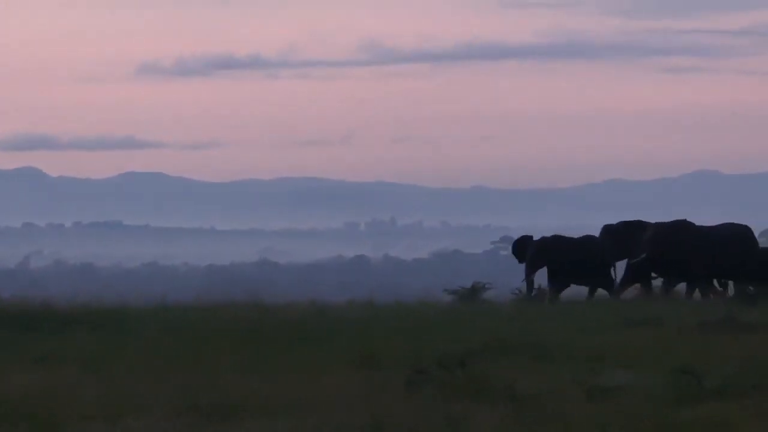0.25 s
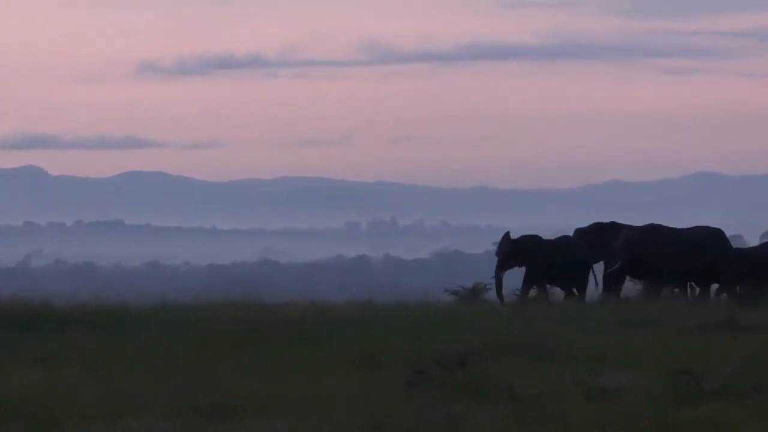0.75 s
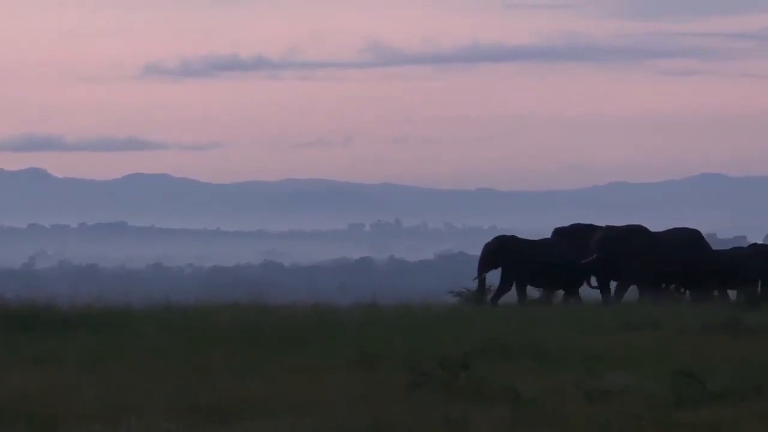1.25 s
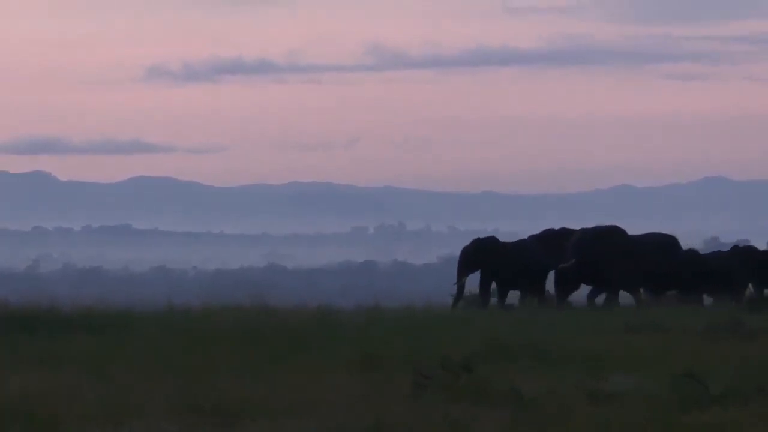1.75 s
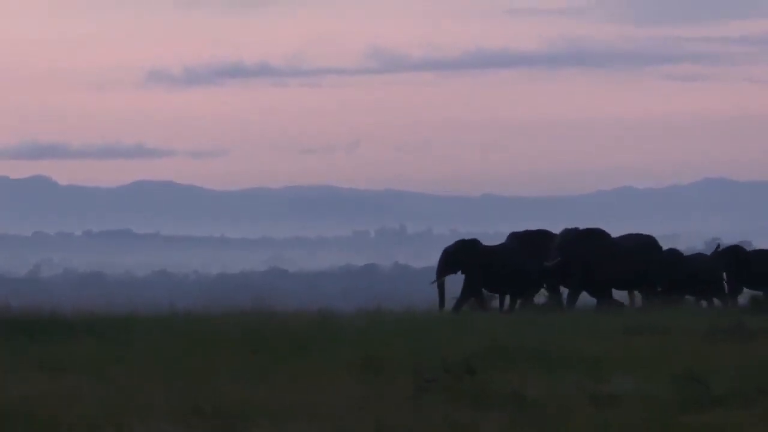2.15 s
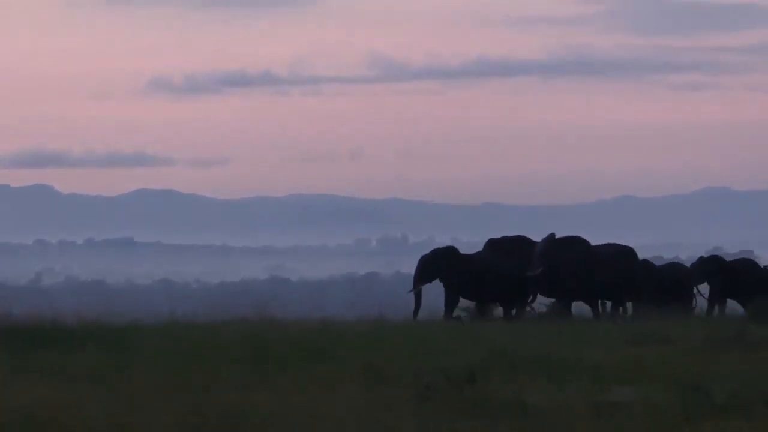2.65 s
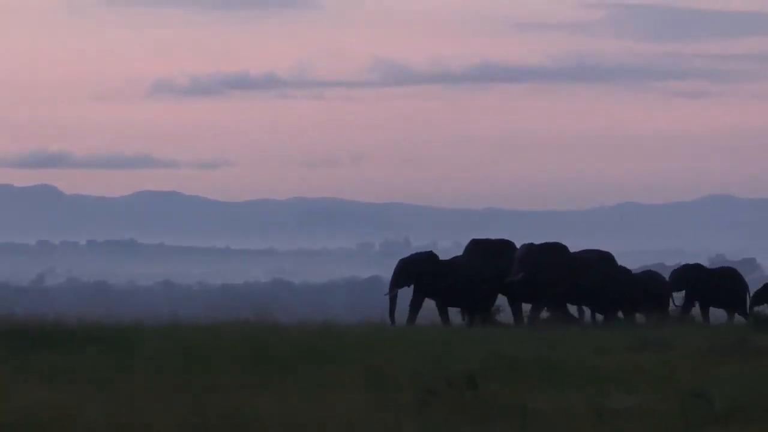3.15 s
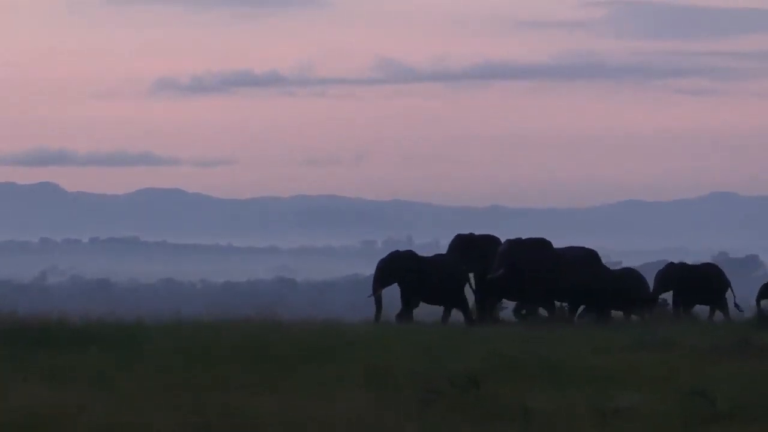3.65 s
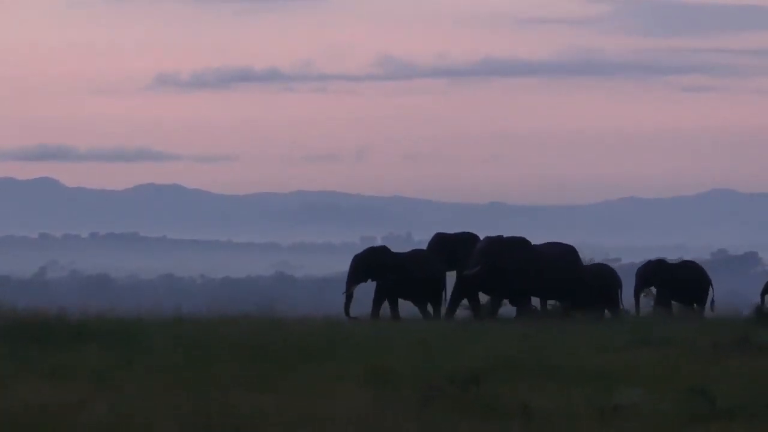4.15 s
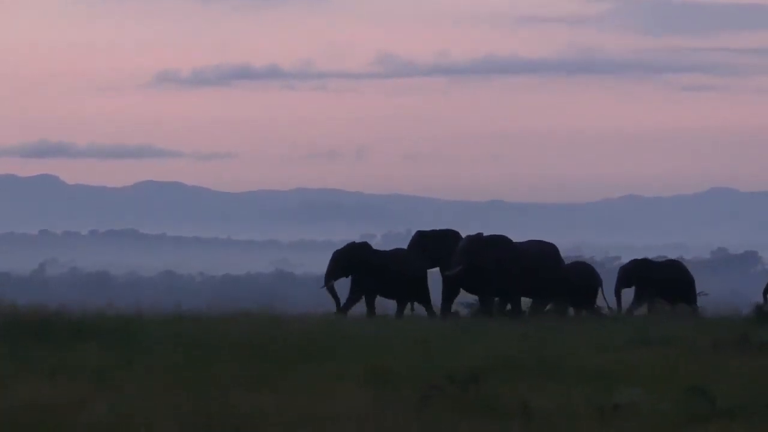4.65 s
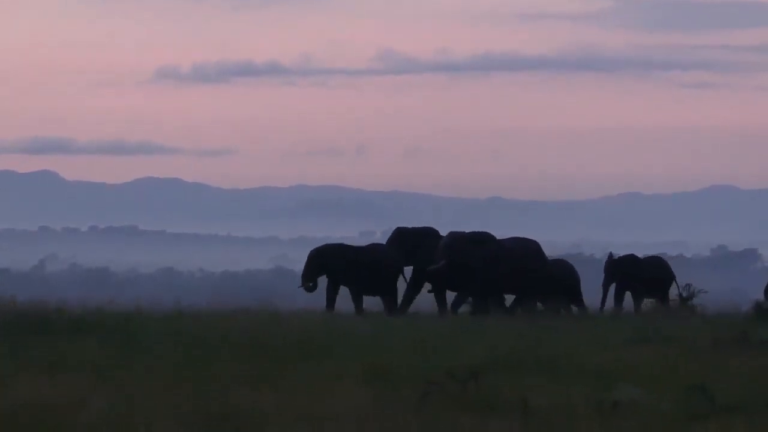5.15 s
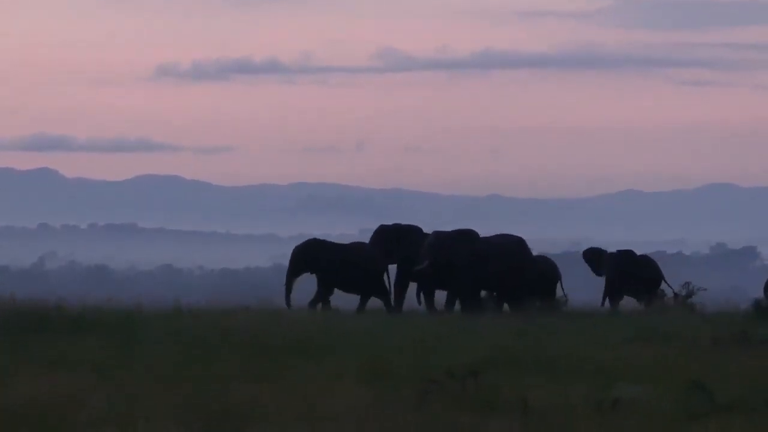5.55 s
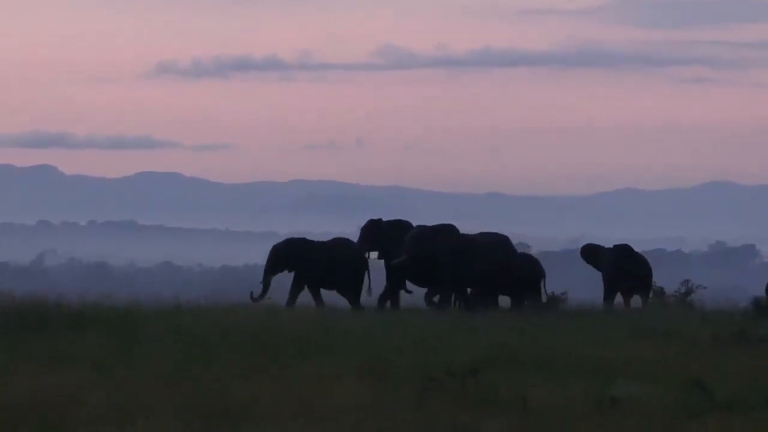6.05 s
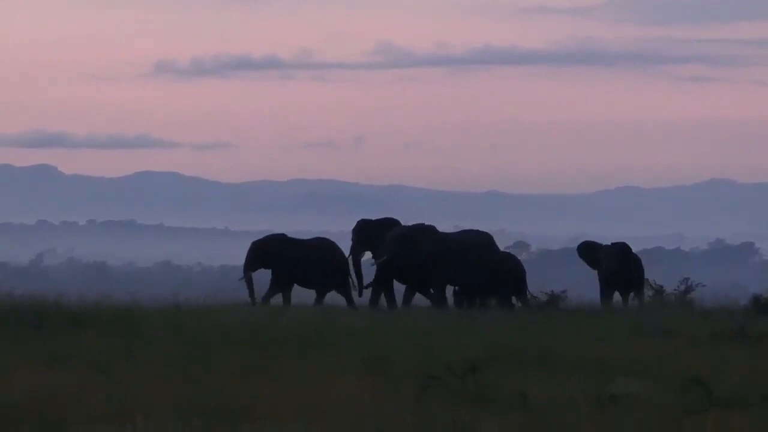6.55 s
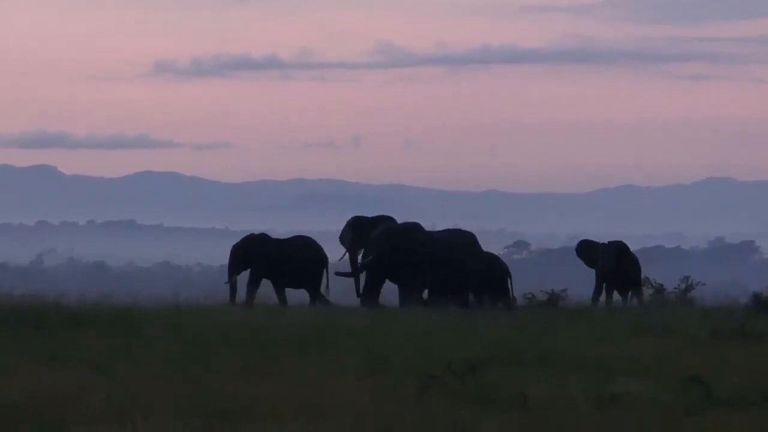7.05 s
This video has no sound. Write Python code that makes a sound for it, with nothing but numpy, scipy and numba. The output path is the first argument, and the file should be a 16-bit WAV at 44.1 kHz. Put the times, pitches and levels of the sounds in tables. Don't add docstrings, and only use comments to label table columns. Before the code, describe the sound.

Quiet open-air ambience with distant birdsong and low wind buffets on two small microphones. After an opening two-note bird whistle, an elephant bellows roughly, beginning in jerky bursts, swelling to a full gravelly roar and closing down dark. Then faint frog pips, a hard wind thump as the whistle returns, fabric shifting and scraping close by, and finally sparse far chirps, cricket trills and soft wind.

```python
import sys
import numpy as np
from scipy import signal
from scipy.fft import rfft, irfft
from scipy.io import wavfile
from scipy.ndimage import uniform_filter1d
from numba import njit

SR = 44100
rng = np.random.default_rng(int(sys.argv[2]) if len(sys.argv) > 2 else 0)


def wav_record(signal):
    frames = np.transpose(np.atleast_2d(signal))
    bounded = np.clip(frames, -1, 1)
    quanta = np.round(bounded * 32767).astype(np.int16)
    wavfile.write(sys.argv[1], SR, quanta)


def ratio_of_db(decibels):
    return 10 ** (np.asarray(decibels, float) / 20)


N = 321489

# (frequency [Hz], density [dB per Hz])
FIELD_TONE = [(18, -43), (30, -13), (108, -2), (203, -3), (256, -2), (400, -9.5), (444, 5.5), (592, -10.5),
              (1030, -4.5), (1270, -9.5), (2560, -7), (2920, -5), (3160, -13), (4680, -13), (15600, -58.5)]
FIELD_DB = -50

# (time [s], level [dB])
WIND_LEVEL = [(0, -54.5), (.18, -51.5), (.6, -60), (1.6, -61), (1.8, -46), (2.15, -48), (2.3, -60),
              (2.98, -66.5), (3.2, -54.5), (3.5, -56.5), (3.95, -55), (4.39, -44.5), (4.55, -52),
              (4.66, -60.5), (5.7, -65), (6.58, -56), (6.92, -62.5), (7.15, -52.5)]
# (time [s], extra level [dB], half length [s])
GUST_SWELLS = [(2.59, 14, 0.041), (2.4, 3, 0.086), (2.9, 1, 0.11), (3.44, -8, 0.063), (3.62, -7, 0.042),
               (5.3, -1.5, 0.16), (6.8, 3, 0.093), (5.1, 0, 0.045), (3.35, -6, 0.066), (2.68, 1, 0.046),
               (.75, 1, .06), (2.7, -14, 0.032), (6.3, -2.5, 0.13), (4.3, 7, 0.035), (5.4, 1, .03),
               (5.6, -2, 0.027), (5.8, 7.5, 0.12), (6.1, -0.5, .08), (6.92, 10, 0.037), (7.02, -6, 0.037),
               (7.22, 2.5, 0.027)]
# (crest time [s], peak level [dB], pitch [Hz])
BUFFETS = [(.061, -28.5, 307), (0.194, -29.5, 160), (.518, -32.5, 128), (0.885, -41.5, 120),
           (1.17, -41.5, 120), (1.751, -32, 108), (1.939, -31, 114), (2.06, -33.5, 113), (2.182, -38, 110),
           (3.269, -40, 236), (3.759, -38, 125), (3.93, -32, 161), (3.97, -30, 136), (4.098, -25, 143),
           (4.205, -37.5, 162), (4.278, -34.5, 175), (4.335, -23, 157), (4.362, -24.5, 213),
           (4.407, -26, 158), (4.428, -28, 175), (4.453, -35, 123), (4.476, -30.5, 121), (4.506, -32, 144),
           (4.529, -13, 247), (4.546, -29, 190), (4.891, -41.5, 79.5), (6.006, -45, 113), (6.358, -42, 103),
           (6.664, -34, 115), (7.101, -30.5, 159)]
# (time [s], length [s], peak level [dB], pitch [Hz])
BUFFET_RUNS = [
    (.11, .02, -42, 105),
    (1.048, .02, -47, 123),
    (3.13, .25, -45, 194),
    (4., .31, -39.5, 127),
    (5.02, .02, -48, 89.5),
    (6.44, .26, -40.5, 110),
    (7.15, .06, -37, 135),
]
BUFFET_EVERY_S = 0.03

# (time [s], hold [s], extra level [dB])
CLOTH_SHIFTS = [
    (3.248, .02, 1.5),
    (3.96, 0.022, 7.5),
    (4.154, 0.17, 8.5),
    (4.6, 0.48, 6),
    (5.346, 0.15, 8.5),
    (6.314, 0.16, 2.5),
]
CLOTH_DB, CLOTH_RISE_S, CLOTH_FALL_S = -65, 0.22, 0.085
# (time [s], length [s], level [dB])
SCRAPE_SLIPS = [(.74, .05, -61), (.94, .07, -59), (5.345, .17, -52), (5.352, .009, -40), (5.376, .012, -45),
                (5.393, .03, -44), (5.41, .03, -41), (5.428, .022, -41), (5.457, .013, -46),
                (5.471, .012, -50), (5.483, .012, -48)]
# (time [s], peak level [dB], centre [Hz])
CLOTH_TICKS = [
    (.058, -48, 3000),
    (.327, -50, 3000),
    (.765, -51, 2500),
    (.989, -47, 4500),
    (3.269, -46, 5000),
    (4.997, -37, 4300),
    (5.486, -36, 8000),
    (5.566, -48, 9000),
    (6.391, -47, 9000),
]

# (time [s], length [s], peak level [dB])
CRICKET_TRILLS = [
    (.022, .1, -55),
    (.42, .16, -57),
    (.745, .24, -60),
    (6.19, .12, -65),
    (6.502, .05, -64),
    (6.92, .33, -65),
]
CHIRP_EVERY_S = .039
# (time [s], run length [s], peak level [dB])
FROG_PIPS = [
    (2.131, .63, -49.5),
    (2.792, .16, -53),
    (4.4574, .01, -55),
    (4.5585, .01, -50.5),
    (4.922, .01, -39),
    (4.985, .01, -38.5),
    (5.3417, .01, -47),
]
PIP_HZ, PIP_EVERY_S = 2700, .0664

# (time [s], length [s], first pitch [Hz], last pitch [Hz], level
# [dB])
FAR_SLURS = [(0, 0.053, 3900, 2660, -56), (.091, 0.034, 2520, 2880, -52.5), (.024, 0.17, 2170, 2074, -67),
             (6.675, 0.05, 1770, 1600, -58), (.838, 0.044, 2770, 2470, -54),
             (2.771, 0.024, 4700, 3960, -62), (4.6, 0.128, 4050, 3960, -61.5),
             (5.025, 0.051, 3640, 3450, -61), (5.508, 0.051, 3710, 3570, -59.5),
             (5.939, 0.0255, 3450, 2930, -57), (6.162, 0.035, 3250, 3420, -63),
             (6.341, 0.039, 2710, 1970, -51.5), (6.539, 0.013, 2700, 2530, -51.5),
             (6.98, 0.04, 3560, 3730, -61.5),
             (.005, 0.18, 2070, 2056, -63), (0.141, 0.21, 2300, 2263, -63),
               (0.333, 0.099, 3860, 3966, -62), (0.459, 0.062, 1360, 1626, -64),
               (0.528, 0.047, 1640, 1410, -70), (.945, 0.065, 4600, 4450, -64),
               (1.1, 0.13, 2700, 2960, -65), (2.412, .075, 3650, 3000, -64), (2.89, 0.067, 2040, 2170, -67),
               (3.026, 0.079, 3180, 3600, -73), (3.12, 0.035, 2200, 2150, -61.5),
               (3.26, 0.13, 1840, 1780, -66.5), (3.645, 0.032, 3550, 3750, -71),
               (3.813, 0.023, 3060, 3020, -61), (4.007, 0.032, 2210, 2300, -63),
               (4.28, 0.029, 2020, 1970, -64), (5.139, 0.16, 4120, 3950, -70.5),
               (5.615, .035, 3650, 3700, -64), (5.745, 0.045, 2610, 2510, -57),
               (5.674, 0.046, 2220, 2380, -61), (5.736, .04, 2056, 2070, -60),
               (5.995, .03, 3280, 3260, -63), (6.415, 0.032, 3600, 3810, -60),
               (6.4, 0.067, 3200, 3310, -62), (6.525, .015, 4110, 4260, -65),
               (6.65, 0.048, 2170, 2240, -60), (6.752, 0.11, 3700, 3850, -71),
               (6.84, 0.04, 3350, 3520, -62), (6.993, 0.05, 1650, 1500, -65),
               (6.98, 0.095, 3180, 3040, -65), (6.39, 0.049, 1840, 1570, -61.5),
               (6.82, 0.066, 1870, 1867, -63)]
# (time [s], length [s], first pitch [Hz], level [dB])
RISING_SLURS = [
    (3.874, 0.083, 2306, -58),
    (4.331, 0.068, 1806, -59),
    (5.261, 0.12, 1940, -61),
    (5.863, 0.045, 2320, -53.5),
]
UPSLUR_RISE = 1.36
# (time [s], level [dB])
BIRD_CHIPS = [
    (1.363, -54),
    (1.909, -51.5),
    (2.144, -48.5),
]
CHIP_S, CHIP_HZ, CHIP_END_HZ = 0.0126, 3860, 4500
# (level [dB], tune of (time [s], pitch [Hz]))
BENT_TUNES = [(-61, [(2.67, 2000), (2.71, 2850), (2.745, 3120)]), (-58.5, [(2.885, 3990), (2.935, 3300),
              (3.06, 2920)]), (-60, [(2.92, 3400), (2.965, 2900)]), (-56, [(3.18, 2050), (3.225, 2290),
              (3.243, 2840), (3.262, 2820)]), (-62, [(3.32, 2350), (3.345, 2900), (3.375, 3020),
              (3.44, 2850)]), (-71, [(3.47, 2410), (3.51, 2950), (3.68, 3010)]), (-64, [(3.53, 2050),
              (3.56, 2270), (3.61, 2210)]), (-54.5, [(5.555, 3420), (5.577, 2960), (5.592, 3040)]),
              (-67.5, [(5.575, 1720), (5.62, 1874), (5.71, 1880)]), (-66, [(5.645, 3920), (5.7, 4040),
              (5.73, 3980), (5.77, 3600)]), (-54.5, [(5.68, 3440), (5.725, 3520), (5.82, 3165), (5.9, 3025),
              (5.97, 2840), (6.09, 2690)]), (-58, [(5.875, 2180), (5.9, 2650), (5.93, 2830)]),
              (-62, [(5.962, 2780), (5.99, 2680)]), (-54, [(5.97, 1830), (6.048, 2700), (6.078, 2600)]),
              (-56.5, [(6.755, 2800), (6.78, 2520), (6.835, 2410)]), (-60, [(7.03, 1845), (7.055, 2080),
              (7.093, 2850)]), (-64, [(7.058, 4080), (7.085, 3320), (7.118, 2570)]), (-61, [(7.155, 2240),
              (7.19, 2800), (7.215, 2710)]), (-64, [(7.197, 2910), (7.225, 3170), (7.25, 3180)])]
BENT_SWELL_DB = 2
FALL_BEND, RISE_BEND = 0.604, .8
FAINT_DB = -58
# (time [s], extra level [dB], half length [s])
CROWD_SWELLS = [
    (.15, 9, 0.15),
    (2.8, 3.5, 0.16),
    (3.35, 1, 0.19),
    (4.1, -15, 0.09),
    (5.75, 6.5, 0.79),
    (6.75, 5.5, 0.19),
]
CHORUS_DB, CHORUS_LOW_HZ, CHORUS_SPAN_HZ = -70.5, 1450, 2000

# (time [s], falling note [dB], its swell [dB per s], level note [dB], its swell [dB per s])
BIRD_SONGS = [
    (.04, -36.5, -3, -35.5, 0),
    (4.446, -35.5, -15, -36.5, -12),
]
LEVEL_AFTER_S = 0.3385
# (time [s], pitch [Hz], level [dB])
FALLING_TUNE = [(.005, 4770, -9), (0.03, 4470, 1.5), (0.065, 4070, -9.5), (0.084, 3930, -2),
                (.118, 3700, 2), (.135, 3610, -3.5), (0.186, 3356, -3), (0.213, 3260, 5),
                (0.247, 3030, -17.5)]
# (time [s], pitch [Hz], level [dB])
LEVEL_TUNE = [(.003, 3050, -10), (.016, 3000, -2), (.035, 2950, -4.5), (.07, 2938, -6), (0.151, 3004, -1.5),
              (.19, 3080, -1), (.205, 3125, -3.5), (.216, 3010, 0)]
FLUTTER_HZ, FLUTTER_DB = 48, 2.5

# (time [s], effort [dB], jaw closed [0-1])
ROAR_EFFORT = [
    (1.218, -39.5, 0.04),
    (1.4, -38.5, 0.35),
    (1.56, -32.5, 0),
    (1.7, -29.5, 0.32),
    (1.9, -30.5, 0.27),
    (2.05, -28.5, 0.57),
    (2.29, -28, 0.51),
    (2.35, -38, 0.95),
    (2.5, -58.5, 0.77),
]
# (time [s], level [dB], pitch [Hz])
CHEST_NOTE = [
    (1.13, -57, 250),
    (1.22, -40, 265),
    (1.55, -35.5, 262.4),
    (1.66, -45.5, 250),
    (2.14, -43, 290),
    (2.21, -34.5, 277),
    (2.4, -38.5, 259.5),
    (2.47, -42, 252),
    (2.53, -58.5, 238),
]
CHEST_TONE = .42
# (time [s], extra level [dB])
CHEST_BOOMS = [
    (1.832, 8.4),
    (2.232, 3.6),
    (2.31, 9.1),
    (2.4, 2.2),
]
BOOM_S = 0.031
# (time [s], extra level [dB], fading [s])
BREATH_HEAVES = [
    (1.221, 4, .02),
    (1.26, 4, .012),
    (1.287, 2, .01),
    (1.342, 12, .01),
    (1.358, 5, .01),
    (1.378, 4, .008),
    (1.495, 3, .012),
    (1.527, 5, .01),
    (1.557, 7, .008),
]
HEAVE_SLAP = 22
# (time [s], extra level [dB])
FOLD_SLAPS = [(1.578, 2), (1.674, 4), (1.704, 4), (1.745, 5), (1.77, 3), (1.79, 2), (1.815, 4), (1.844, 3),
              (1.903, 2), (1.946, 2), (2.067, 3), (2.143, 4), (2.193, 2), (2.23, 2)]
SLAP_FADE_S = 0.0021
FOLDS_HZ, TURBULENCE = 199., .3
# (centre [Hz], width [Hz], level [dB])
MOUTH_MODES = [(830, 220, 3), (1040, 400, 7), (1200, 170, -3), (940, 110, -9)]
# (centre [Hz], width [Hz], level [dB])
LOW_MOUTH_MODES = [(685, 95, 3), (590, 80, -8), (505, 60, -4)]
# (centre [Hz], width [Hz], level [dB])
UPPER_MODES = [(1720, 280, 14), (2000, 320, 11), (2270, 200, 8), (1550, 200, 4)]
MOUTH_LOW_HZ, MOUTH_TOP_HZ = 440, 1325
JAW_OPEN_DB, JAW_SHUT_DB = -12.5, 6
JAW_DROP = .12
PATCHY_DB = 2.5
# (time [s], strain [0-1], half length [s], rasp centre [Hz])
THROAT_STRAINS = [(1.27, 0, .03, 3030), (1.355, 1.1, 0.02, 2920), (1.495, 0.8, 0.018, 2950),
                  (1.56, 0.35, 0.021, 3100), (1.69, 0.4, 0.036, 3070), (1.745, 0, 0.012, 3150),
                  (1.85, 0.46, 0.042, 3550), (1.98, 0.2, 0.054, 3760), (2.11, 0.24, 0.033, 3280),
                  (2.23, 0.88, 0.069, 3680), (2.43, 1, 0.07, 3060)]
UPPER_DB, UPPER_STRAIN_DB, RASP_DB, RASP_STRAIN_DB = -15.5, 4, -23, 10.5
# (time [s], centre [Hz], extra level [dB])
TONGUE_RIDGE = [(1.3, 1734, 0), (1.67, 1780, -2.5), (1.88, 1770, -1.5), (1.94, 1740, -3), (2.0, 1820, 3.5),
                (2.085, 1650, -8.5), (2.15, 1745, -0.5), (2.25, 1680, -2.5), (2.34, 1690, 3.5)]
# (time [s], gain against the broad ridge, half length [s])
TONGUE_PINCHES = [
    (1.9, 1.5, 0.069),
    (2.14, 1.1, 0.02),
    (2.245, 3.7, 0.063),
]
PINCH_WIDTH_HZ = 164
# (time [s], left minus right [dB])
HEAD_BALANCE = [(1.2, 0.5), (1.7, 1), (2.1, 1), (2.45, 1.5)]

# (frequency [Hz], left minus right [dB])
PORT_SHADE = [(60, -10), (110, 31), (200, 1.5), (380, 0), (700, -1.5), (1290, -10), (2380, -5), (4400, -6),
              (8120, 2), (15000, 0.0)]
# (frequency [Hz], left lead [radians])
PORT_LEAD = [(100, 0.01), (690, -0.95), (1210, -0.59), (1550, -0.014), (2330, -0.82), (4900, 0.23)]
SIDE = np.array([[1], [-1]])
AIR_SHIFTS_S = .05
MIC_LOW_HZ = 48.7


def unit(x):
    return x / np.sqrt(np.mean(x ** 2))


def columns(table, outside=None):
    s, *cols = np.transpose(table)
    return [np.interp(np.arange(N) / SR, s, c, left=outside, right=outside) for c in cols]


def on_log(table, hz):
    f, v = np.transpose(table)
    return np.interp(np.log(hz + 1), np.log(f + 1), v)


@njit
def svf(x, hz, width):
    y, b, l = np.empty(len(x)), 0., 0.
    for i in range(len(x)):
        g, k = np.tan(np.pi * hz[i] / SR), width / hz[i]
        v = (b + g * (x[i] - l)) / (1 + g * (g + k))
        b, l, y[i] = 2 * v - b, l + 2 * g * v, k * v
    return y


def ring(x, hz, width_hz):
    hz = hz + np.zeros(len(x))
    return svf(svf(x, hz, 1. * width_hz), hz, 1. * width_hz)


def hiss(hz, width_hz):
    return unit(ring(rng.standard_normal(N), hz, width_hz))


def walk(rate):
    k = int(SR / rate)
    held = np.repeat(rng.standard_normal(N // k + 1), k)
    return 1.3 * uniform_filter1d(uniform_filter1d(held, k), k)[:N]


def bumps(rows):
    t = np.arange(N) / SR
    return sum(top * np.exp(-((t - s) / half) ** 2) for s, top, half in rows)


def steady(x, hold_s):
    k = int(hold_s * SR)
    power = uniform_filter1d(uniform_filter1d(x ** 2, k), k)
    return x / np.sqrt(power + 1e-12)


def train(rows, every_s, jitter, scatter_db):
    beats = [(s + k, db, *more) for s, length, db, *more in rows for k in np.arange(0, length, every_s)]
    chance = rng.standard_normal((len(beats), 2))
    return [(s + jitter * every_s * a, db + scatter_db * b, *more)
            for (s, db, *more), (a, b) in zip(beats, chance)]


def add(out, s, sound):
    i = int(s * SR)
    out[..., i:i + sound.shape[-1]] += sound[..., :N - i]


def pan(db):
    return ratio_of_db(np.array([[db], [-db]]) / 2)


def ports(x):
    hz = np.fft.rfftfreq(N, 1 / SR)
    half = ratio_of_db(on_log(PORT_SHADE, hz) / 2) * np.exp(.5j * on_log(PORT_LEAD, hz))
    return np.array([irfft(rfft(x) * half, N), irfft(rfft(x) / half, N)])


def far_trees(x, t60, db, apart, shifting=False):
    t = np.arange(int(t60 * SR)) / SR
    paths = rng.standard_normal((2, len(t)))
    hop = int(AIR_SHIFTS_S * SR) if shifting else N
    window = np.sin(np.pi * np.arange(2 * hop) / (2 * hop)) if shifting else np.ones(N)
    x, out = x * np.ones((2, 1)), np.zeros((2, N))
    for k, i in enumerate(range(0, N, hop)):
        same, other = np.roll(paths, 997 * k, axis=1) * ratio_of_db(-60 * t / t60)
        tail = (same + apart * SIDE * other) / np.sqrt(np.sum(same ** 2))
        piece = x[:, i:i + len(window)]
        piece = piece * window[:piece.shape[1]]
        add(out, (i + .5) / SR, signal.fftconvolve(piece, tail, axes=1))
    return ratio_of_db(db) * out


def field():
    out, swell = 0, walk(0.72)
    for hz in 240 * 2 ** (np.arange(19) / 3):
        db = on_log(FIELD_TONE, hz) + 10 * np.log10(hz)
        db = db + .6 * swell + 1.3 * walk(9) * (hz < 4000)
        out = out + ratio_of_db(db) * (hiss(hz, hz * 0.34) + 0.93 * SIDE * hiss(hz, hz * 0.34))
    return ratio_of_db(FIELD_DB - 6.0) * out / np.sqrt(np.mean(out.mean(0) ** 2))


def wind():
    wind_db = columns(WIND_LEVEL)[0]
    eddies = ratio_of_db(0.3 * (wind_db + 55)) * hiss(105, 110) + .6 * SIDE * hiss(90, 120)
    eddies = eddies + ratio_of_db(-2.5 + 0.39 * (wind_db + 50.5)) * (hiss(191, 152) + .5 * SIDE * hiss(236, 170))
    gust_db = wind_db + 2.0 * walk(30) + bumps(GUST_SWELLS) + 1.4 * walk(5.5) - 2.0
    out = ratio_of_db(gust_db) * eddies + ratio_of_db(-70.0) * hiss(27, 19)
    for s, db, hz in BUFFETS + train(BUFFET_RUNS, BUFFET_EVERY_S, jitter=.25, scatter_db=2.5):
        hardest = db > -20
        pan_db = 7.0 if hardest else 5.4 * rng.standard_normal() - .8
        cycles = np.arange(-2, 2, hz / SR)
        turn = 1.0 * rng.standard_normal() + .3 * rng.standard_normal() * SIDE
        bell = np.exp(-(cycles / (.62 - 0.21 * hardest)) ** 2)
        add(out, s - 2 / hz, -ratio_of_db(db + 1.0) * bell * np.cos(2 * np.pi * cycles + turn) * pan(pan_db))
    return out


def weave():
    middle = ratio_of_db(0.68 * walk(4.9)) * hiss(9360, 8300)
    top = 0.52 * ratio_of_db(1.0 * walk(6.0)) * hiss(14100, 6700)
    return unit(middle + top + .5 * hiss(5850, 2900))


def rustle():
    t = np.arange(N) / SR
    shifts = [np.interp(t, [s - CLOTH_RISE_S, s, s + hold, s + hold + CLOTH_FALL_S], [0, db, db, 0])
              for s, hold, db in CLOTH_SHIFTS]
    cloth_db = CLOTH_DB + np.max(shifts, axis=0) + 1.1 * walk(20)
    cloth = ratio_of_db(cloth_db) * (weave() + .68 * SIDE * weave())
    grit = rng.standard_normal(N) * ratio_of_db(0.76 * walk(300))
    scrape = ring(grit, 4120, 1200) + 0.78 * ring(grit, 5820, 870) + 0.8 * ring(grit, 1760, 780)
    scrape = unit(scrape + 0.84 * ring(grit, 2380, 790) + 0.044 * ring(grit, 10600, 8000))
    slips, ticks = np.zeros(N), np.zeros(N)
    for s, length, db in SCRAPE_SLIPS:
        u = np.linspace(0, 1, int(length * SR))
        add(slips, s, ratio_of_db(db + 8.0) * u ** 0.51 * (1 - u))
    t = np.arange(500) / SR
    for s, db, hz in CLOTH_TICKS:
        click = unit(svf(rng.standard_normal(500), hz + 0 * t, 1. * hz))
        add(ticks, s, ratio_of_db(db - 8) * click * np.exp(-t / .004))
    return cloth + (ticks + slips * scrape) * pan(-1.5)


def cricket():
    gate = np.zeros(N)
    for s, db in train(CRICKET_TRILLS, CHIRP_EVERY_S, jitter=.12, scatter_db=2):
        add(gate, s, ratio_of_db(db - 2.5) * np.hanning(int(0.036 * SR)))
    return gate * hiss(4900, 140)


def frog():
    out, t = np.zeros(N), np.arange(int(.024 * SR)) / SR
    for s, db in train(FROG_PIPS, PIP_EVERY_S, jitter=.02, scatter_db=1.2):
        hz = PIP_HZ * (1 + 0.0029 * rng.standard_normal() + 0.55 * (.014 - t))
        add(out, s, ratio_of_db(db) * np.sin(np.pi * t / t[-1]) ** 0.15 * np.sin(2 * np.pi * hz * t))
    return out


def chorus():
    chance, swell_db = rng.random((800, 6)), bumps(CROWD_SWELLS)
    crowd = []
    for when, size, pitch, slope, loud, low in chance:
        s = 7.2 * when
        hz = CHORUS_LOW_HZ + CHORUS_SPAN_HZ * (pitch + low ** 2) / 2
        db = CHORUS_DB + swell_db[int(s * SR)] + 4 * loud ** 3
        crowd.append((s, .02 + .07 * size ** 2, hz, hz * (.7 + .6 * slope), .4 + 2 * size, db))
    return crowd


def far_birds():
    (out, nearer), air, waver = np.zeros((2, 2, N)), walk(45), walk(60)
    clear = FAR_SLURS
    clear = clear + [(s, length, hz, hz * UPSLUR_RISE, db) for s, length, hz, db in RISING_SLURS]
    clear = clear + [(s, CHIP_S, CHIP_HZ, CHIP_END_HZ, db) for s, db in BIRD_CHIPS]
    slurs = chorus()
    for s, length, hz0, hz1, db in clear:
        slurs.append((s, length, hz0, hz1, RISE_BEND if hz1 > hz0 else FALL_BEND, db + 3.4))
    notes = []
    for s, length, hz0, hz1, bend, db in slurs:
        u = np.linspace(0, 1, int(length * SR))
        notes.append((s, hz0 + (hz1 - hz0) * u ** bend, db, 0))
    for db, tune in BENT_TUNES:
        s, hz = np.transpose(tune)
        glide = np.interp(np.arange(s[0], s[-1], 1 / SR), s, hz)
        glide = uniform_filter1d(glide, size=600, mode="nearest")
        notes.append((s[0], glide, db + 5.5, BENT_SWELL_DB * np.sign(hz[-1] - hz[0])))
    for s, hz, db, fade in notes:
        hz = hz[:N - int(s * SR)]
        span = slice(int(s * SR), int(s * SR) + len(hz))
        u, torn = np.linspace(0, 1, len(hz)), db < FAINT_DB and not fade
        hz = hz * (1 + .003 * (1 + torn) * waver[span])
        shape = np.abs(np.sin(np.pi * u)) ** .35 * ratio_of_db(fade * (u - .5))
        gain = ratio_of_db(db + 1.5 + (.8 + 1.6 * torn) * air[span])
        note = gain * shape * np.sin(2 * np.pi * np.cumsum(hz) / SR)
        add(nearer if fade else out, s, note * pan(2.5 * rng.standard_normal() - .5))
    return out + nearer + far_trees(out + 0.31 * nearer, 0.14, -2.5, 0.4)


def whistle(start, db, swell, tune, flutter_db):
    t = np.arange(N) / SR
    tune = np.add(tune, [start, 0, 0])
    hz = uniform_filter1d(columns(tune)[0], 700) * (1 + 0.0019 * walk(90))
    level_db = np.clip(db + swell * (t - start), -60, -25) + columns(tune, outside=-60)[1]
    level_db = level_db + 1.8 * walk(50) + flutter_db * np.sin(2 * np.pi * FLUTTER_HZ * t)
    gain = uniform_filter1d(ratio_of_db(level_db), 150)
    return np.sqrt(2) * gain * np.sin(2 * np.pi * np.cumsum(hz) / SR)


def whistler():
    out = np.zeros(N)
    for s, fall_db, fall_swell, level_db, level_swell in BIRD_SONGS:
        out += whistle(s, fall_db, fall_swell, FALLING_TUNE, FLUTTER_DB)
        out += whistle(s + LEVEL_AFTER_S, level_db, level_swell, LEVEL_TUNE, 0)
    return out


def cavity(drive, modes, sink=1):
    out = 0
    for k, (hz, width_hz, db) in enumerate(modes):
        gain = (-1) ** k * ratio_of_db(db + PATCHY_DB * walk(16))
        out = out + gain * ring(drive, hz * sink * (1 + .045 * walk(14)), width_hz)
    return steady(out, .04)


def breath_heave():
    t = np.arange(N) / SR
    heaves = BREATH_HEAVES + [(s, extra_db, SLAP_FADE_S) for s, extra_db in FOLD_SLAPS]
    db = sum(extra_db * np.exp(-np.clip(t - s, 0, 1) / fade) * (t > s) for s, extra_db, fade in heaves)
    return uniform_filter1d(ratio_of_db(db), 40)


def throat():
    phase = np.cumsum(FOLDS_HZ * (1 + .06 * walk(110) + .015 * walk(12)) / SR)
    slap = np.diff(np.floor(phase), prepend=0)
    size = ratio_of_db(3.2 * np.clip(rng.standard_normal(N // 60), -2.5, 1.6))[phase.astype(int)]
    air = np.exp(-(phase % 1) / .6) * rng.standard_normal(N)
    drive = size * ((1 - TURBULENCE) * unit(slap) + TURBULENCE * unit(air))
    starts = [int((s + .001) * SR) for s, *_ in BREATH_HEAVES]
    drive = drive + HEAVE_SLAP * np.isin(np.arange(N), starts)
    wheeze = size * (.62 * unit(slap) + .38 * unit(air))
    return drive, wheeze, size * air


def mouth(drive, wheeze, heave):
    jaw, (tongue_hz, tongue_db) = columns(ROAR_EFFORT)[1], columns(TONGUE_RIDGE)
    strain, rasp_hz = bumps([row[:3] for row in THROAT_STRAINS]), columns(THROAT_STRAINS)[2]
    dull = signal.sosfilt(signal.ellip(3, 1, 13, MOUTH_TOP_HZ, fs=SR, output="sos"), drive)
    dull = signal.sosfilt(signal.butter(4, MOUTH_LOW_HZ, "high", fs=SR, output="sos"), dull)
    low_db = JAW_OPEN_DB + (JAW_SHUT_DB - JAW_OPEN_DB) * jaw
    low = ratio_of_db(low_db - 0.7) * cavity(dull, LOW_MOUTH_MODES, 1.06 - JAW_DROP * jaw)
    body = cavity(dull, MOUTH_MODES, 1.02 - JAW_DROP * jaw) - low

    pinch = bumps(TONGUE_PINCHES) * steady(ring(wheeze, tongue_hz, PINCH_WIDTH_HZ), 0.033)
    ridge = cavity(wheeze, UPPER_MODES, tongue_hz / UPPER_MODES[0][0]) + pinch
    ridge = ratio_of_db(UPPER_DB + UPPER_STRAIN_DB * strain + tongue_db) * ridge

    rasp = ring(wheeze, rasp_hz * (1 + .045 * walk(18)), 560)
    rasp = rasp + ratio_of_db(-8) * ring(wheeze, 2650 * (1 + .06 * walk(14)), 500)
    rasp = rasp + ratio_of_db(-24) * ring(wheeze, 4900, 900)
    rasp = ratio_of_db(RASP_DB + RASP_STRAIN_DB * strain + 2.5 * walk(30)) * steady(rasp, .05)
    return body + (ridge + rasp) / heave ** .5


def chest(rush):
    db, hz = columns(CHEST_NOTE)
    db = db + bumps([(s, extra_db, BOOM_S) for s, extra_db in CHEST_BOOMS])
    hum = np.sqrt(2) * np.sin(2 * np.pi * np.cumsum(hz * (1 + .035 * walk(35))) / SR)
    rumble = steady(ring(ring(rush, 1.05 * hz, 260), 1.03 * hz, 105), 0.05)
    mixed = CHEST_TONE * hum + np.sqrt(1 - CHEST_TONE ** 2) * rumble
    return ratio_of_db(db + 0.5) * mixed * ratio_of_db(2.2 * walk(45))


def elephant():
    t, effort_db = np.arange(N) / SR, columns(ROAR_EFFORT)[0]
    heave = breath_heave()
    drive, wheeze, rush = throat()
    start, end = ROAR_EFFORT[0][0], ROAR_EFFORT[-1][0]
    open_mouth = np.interp(t, [start - .004, start, end, end + 0.017], [0, 1, 1, 0])
    breathing = (t > CHEST_NOTE[0][0]) & (t < CHEST_NOTE[-1][0])
    voice = heave * ratio_of_db(effort_db - 1.5) * open_mouth * mouth(drive, wheeze, heave)
    return voice + heave ** .5 * breathing * chest(rush)


def scene():
    head = ratio_of_db(columns(HEAD_BALANCE)[0] * SIDE / 2)
    roar = ports(elephant()) * head
    song = ports(whistler() + frog() + cricket())
    echoes = far_trees(roar, 0.2, -3.5, 0.25, shifting=True)
    echoes = echoes + far_trees(song, 1.0, -21.5, 0.1)
    return field() + wind() + rustle() + far_birds() + song + roar + echoes


def band_limit(x):
    return signal.sosfilt(signal.butter(12, 15820, fs=SR, output="sos"), x)


def record(dry):
    thin = signal.sosfilt(signal.butter(3, MIC_LOW_HZ, "high", fs=SR, output="sos"), dry)
    return band_limit(thin)


dry = scene()
out = record(dry)
wav_record(out)
```